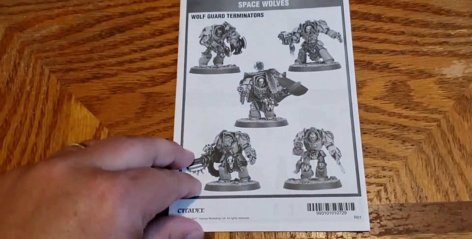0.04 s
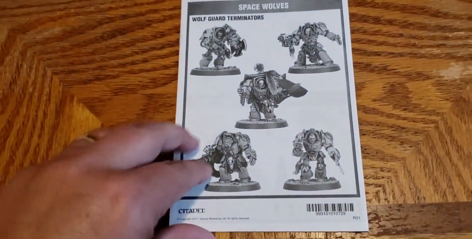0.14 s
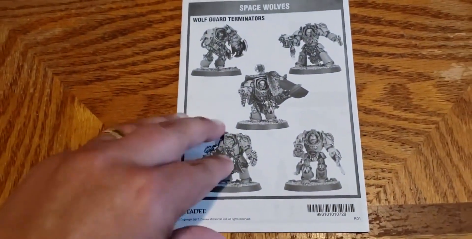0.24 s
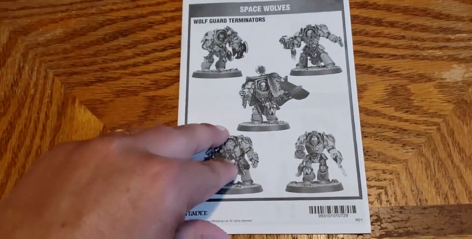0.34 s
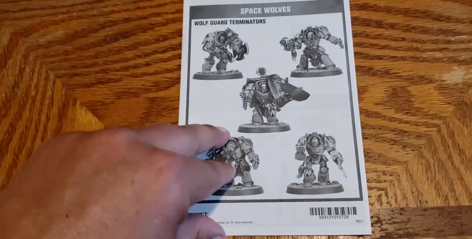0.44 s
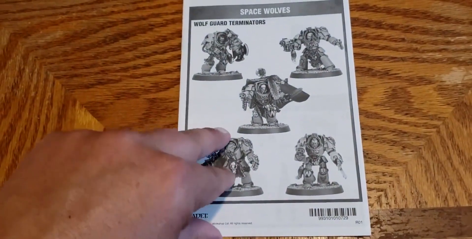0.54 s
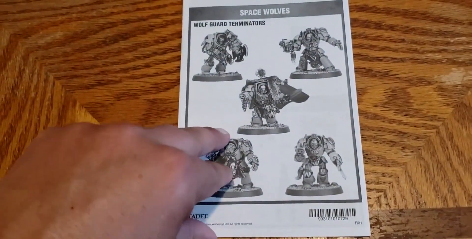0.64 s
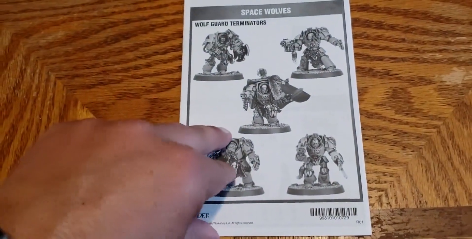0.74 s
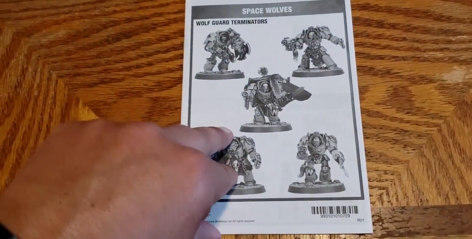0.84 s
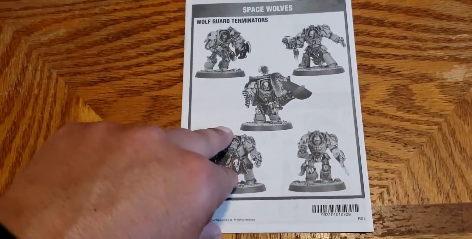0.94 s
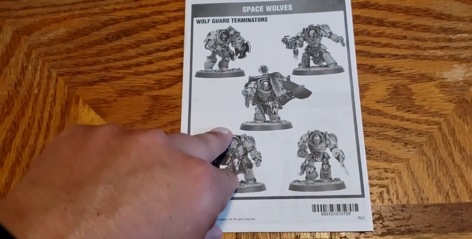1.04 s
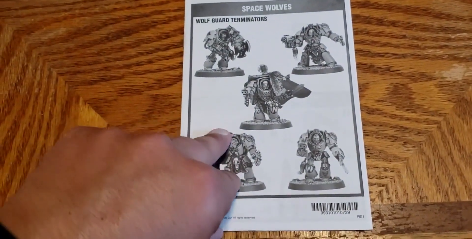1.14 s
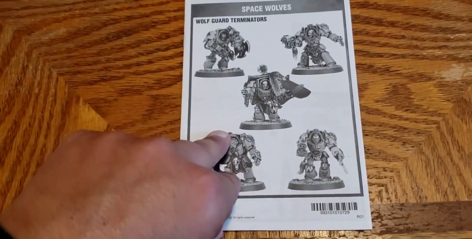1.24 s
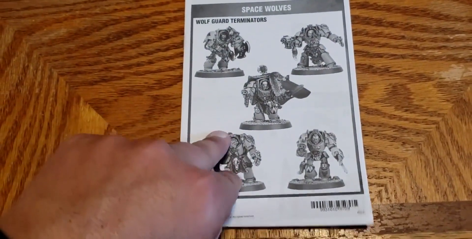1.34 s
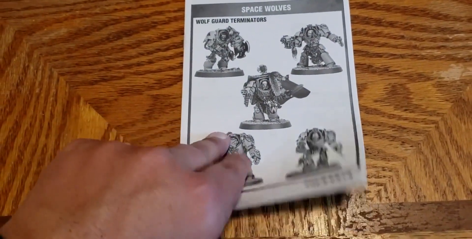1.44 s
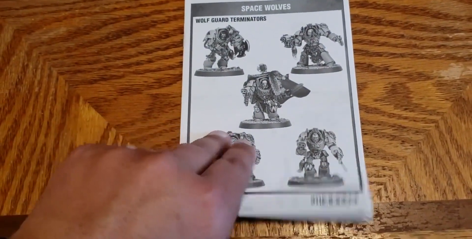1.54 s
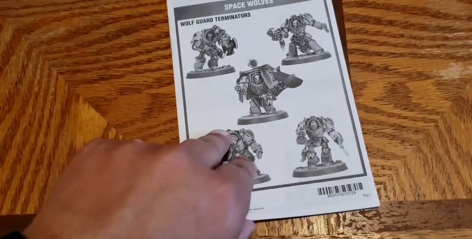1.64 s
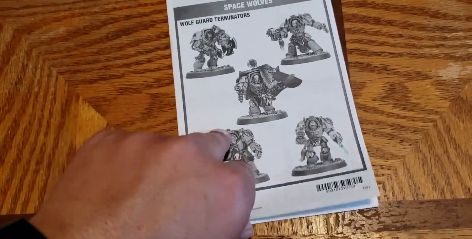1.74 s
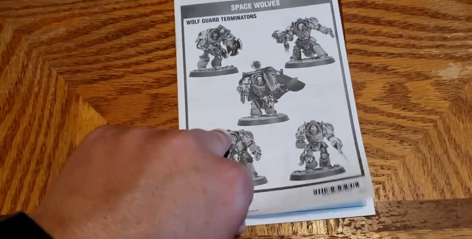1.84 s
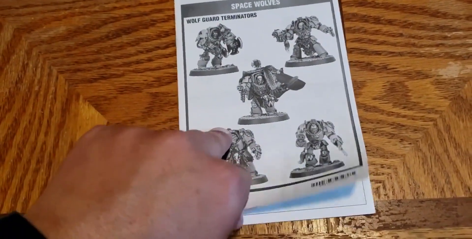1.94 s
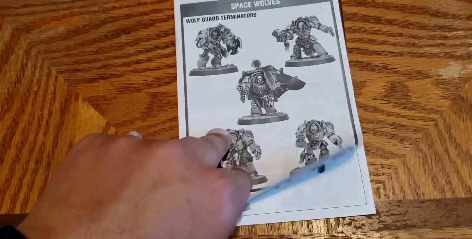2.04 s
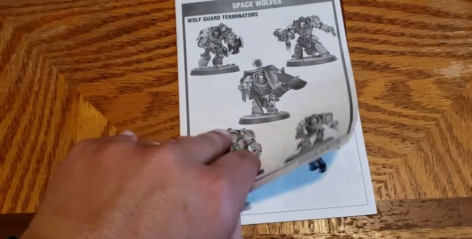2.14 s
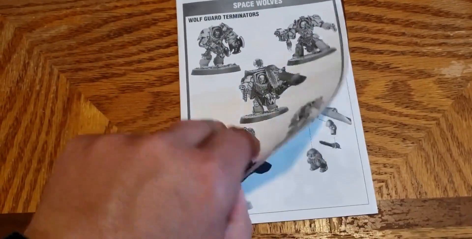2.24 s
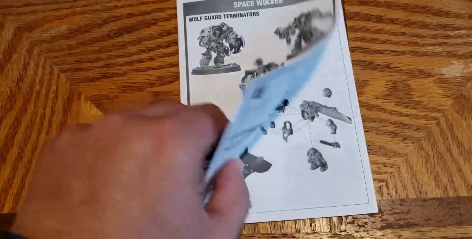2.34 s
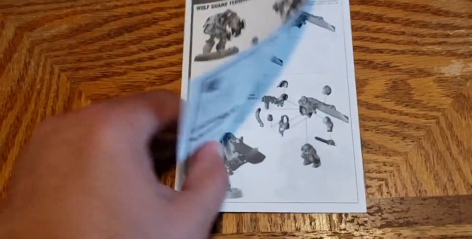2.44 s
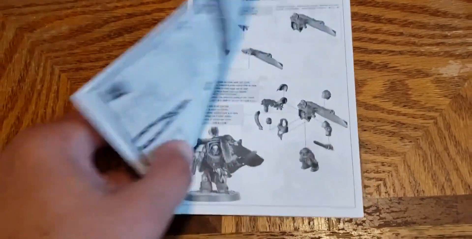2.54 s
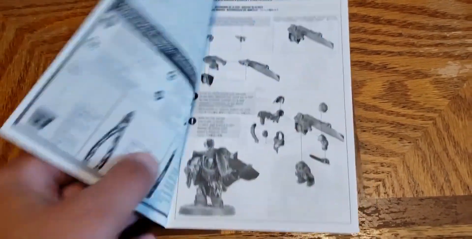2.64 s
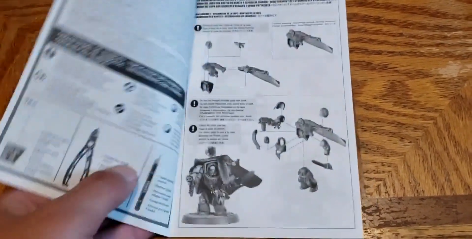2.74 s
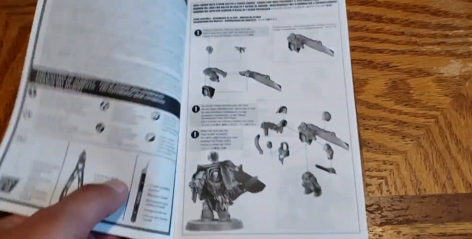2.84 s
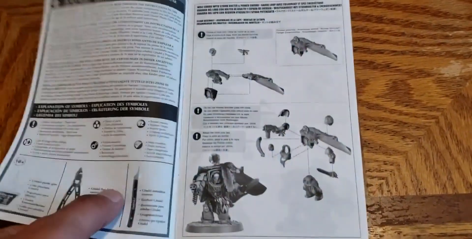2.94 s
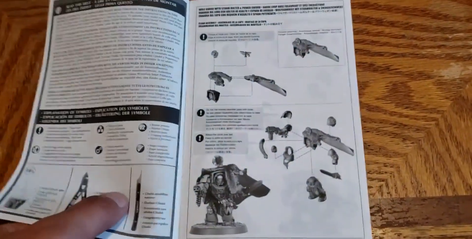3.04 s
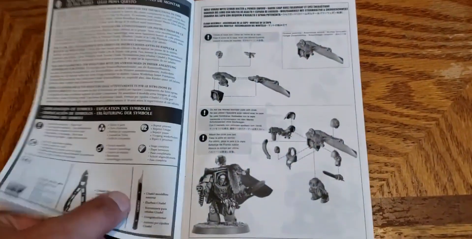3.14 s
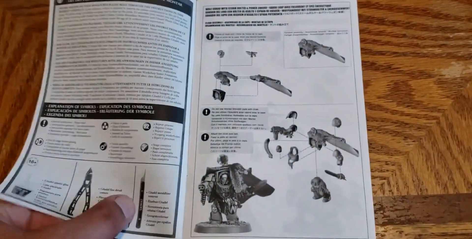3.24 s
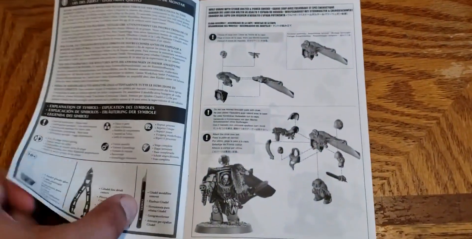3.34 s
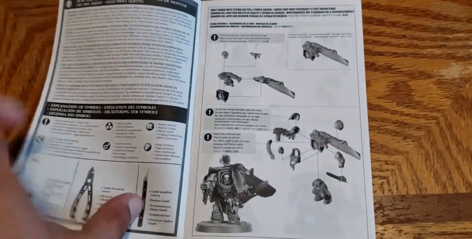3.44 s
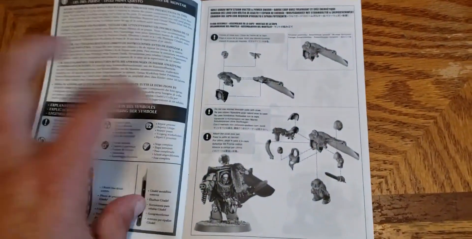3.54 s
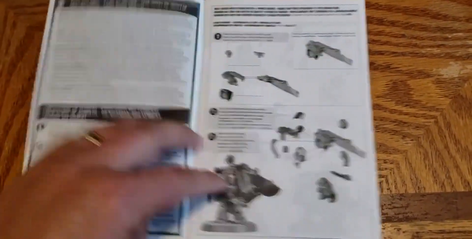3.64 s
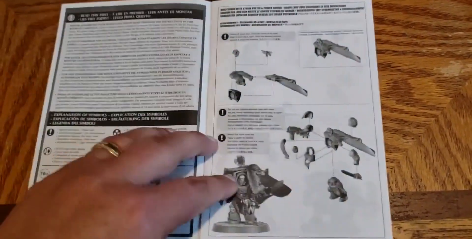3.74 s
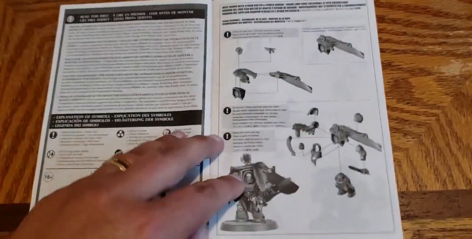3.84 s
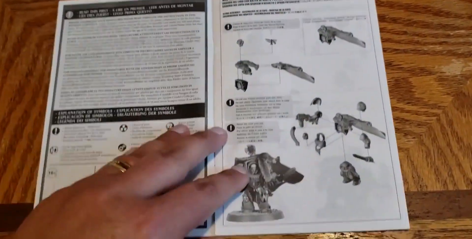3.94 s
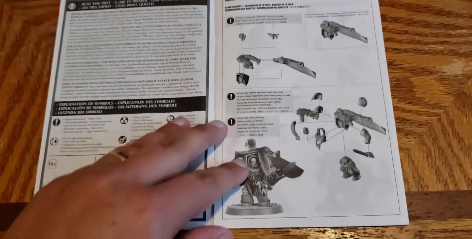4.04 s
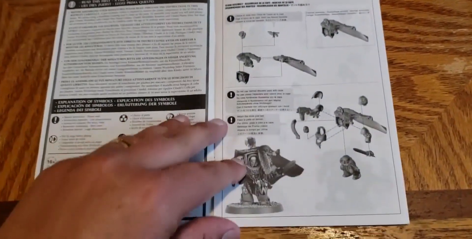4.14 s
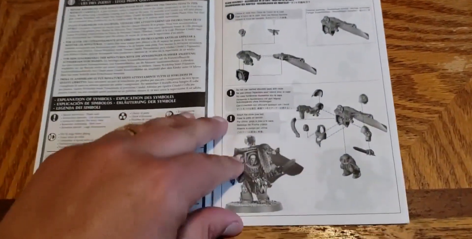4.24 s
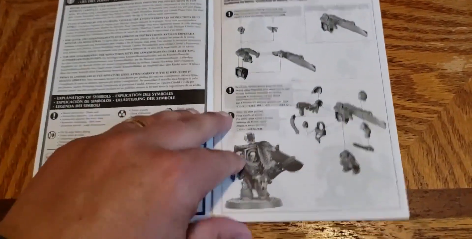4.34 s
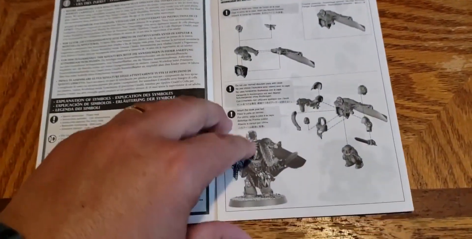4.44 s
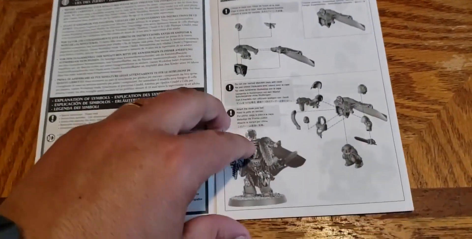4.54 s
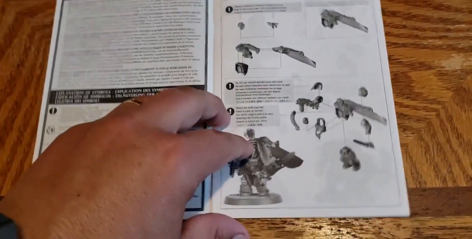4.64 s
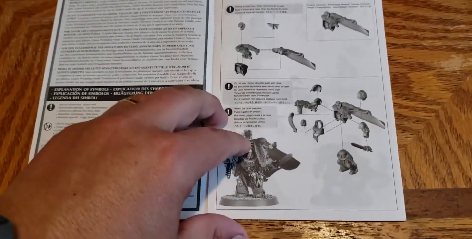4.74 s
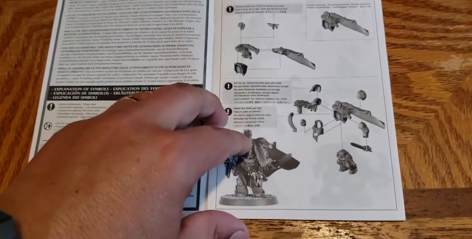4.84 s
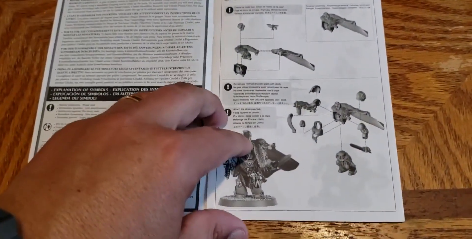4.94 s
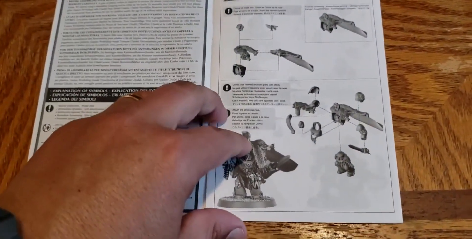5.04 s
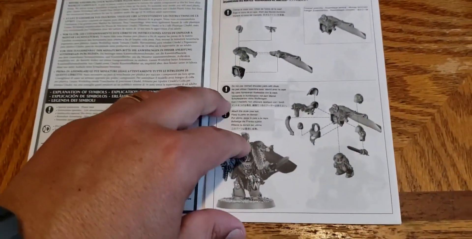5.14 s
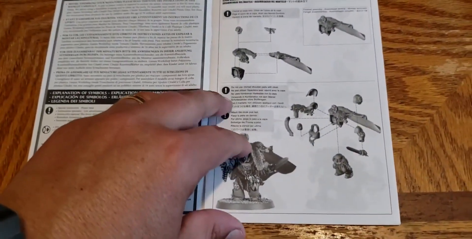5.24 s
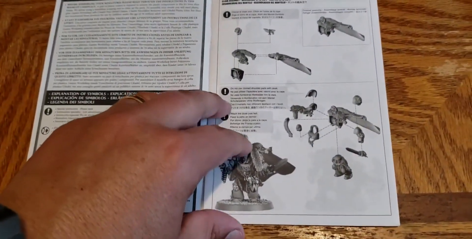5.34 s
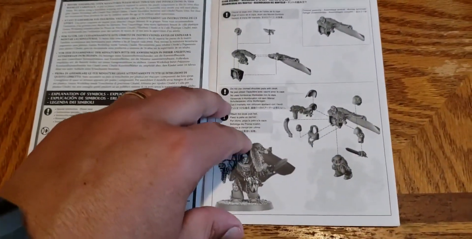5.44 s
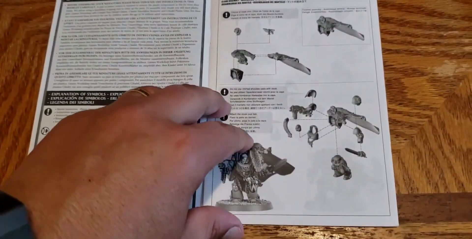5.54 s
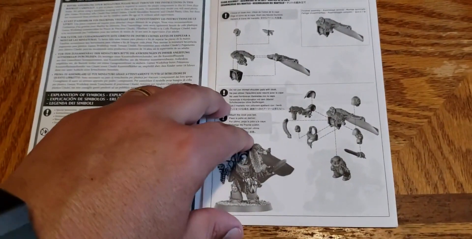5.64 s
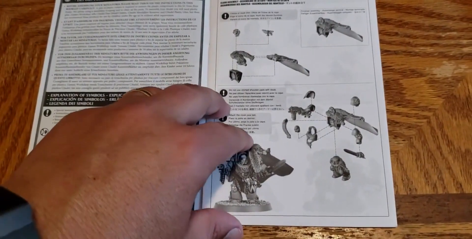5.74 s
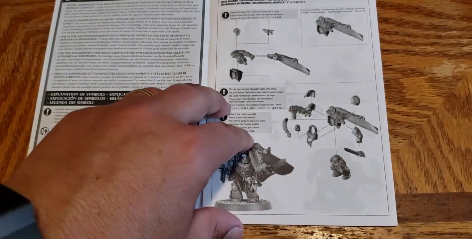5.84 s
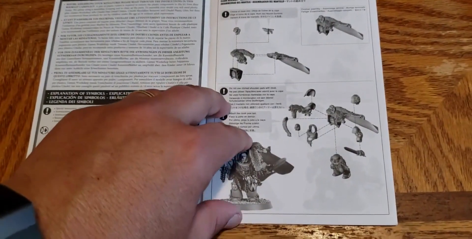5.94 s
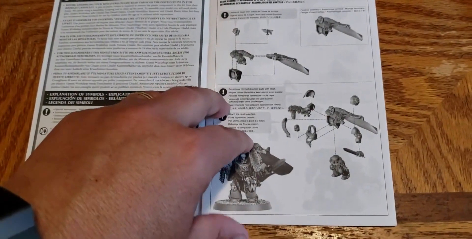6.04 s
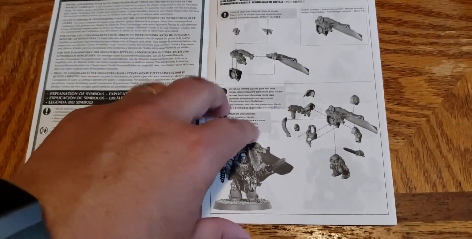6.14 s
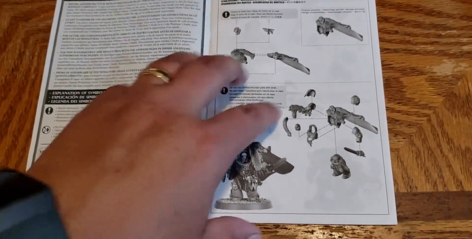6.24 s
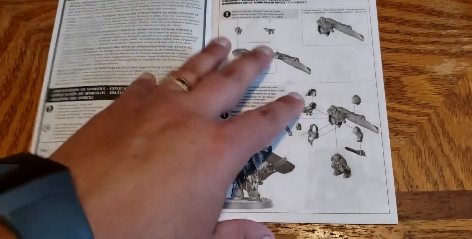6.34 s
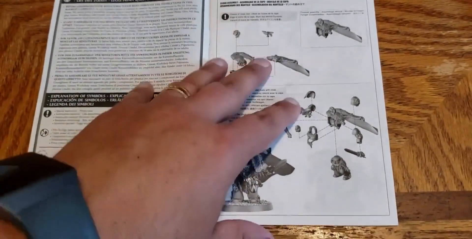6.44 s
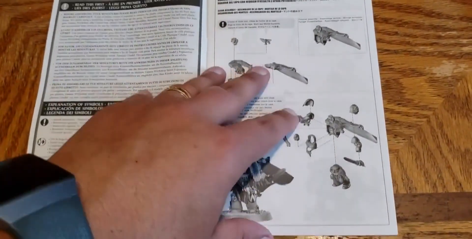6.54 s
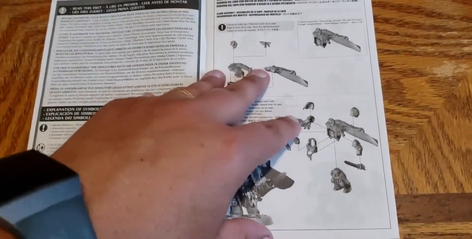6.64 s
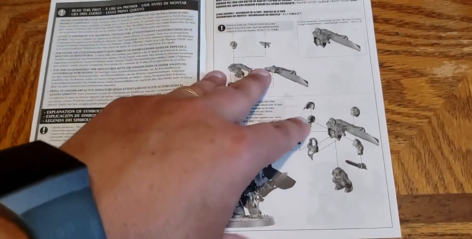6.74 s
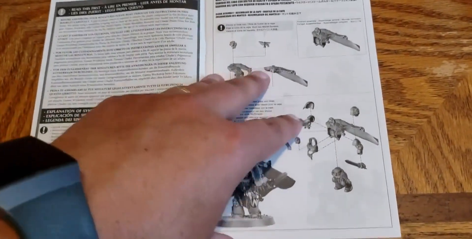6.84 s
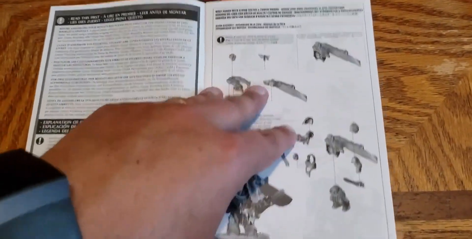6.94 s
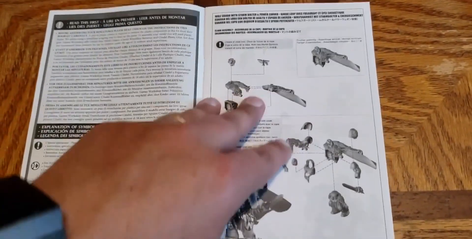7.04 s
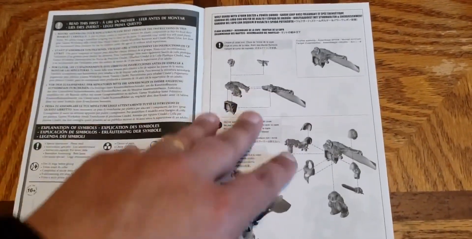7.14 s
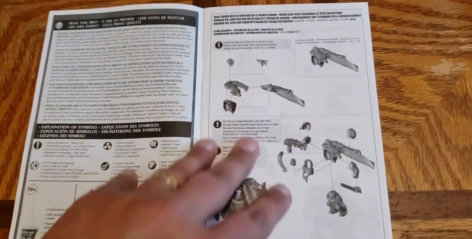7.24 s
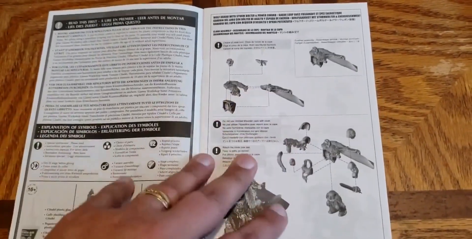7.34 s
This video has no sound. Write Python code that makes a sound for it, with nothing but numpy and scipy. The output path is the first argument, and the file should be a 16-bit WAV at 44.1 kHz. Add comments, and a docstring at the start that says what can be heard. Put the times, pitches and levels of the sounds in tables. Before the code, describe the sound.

Close by in a small, quiet room with a low hum, a hand opens a paper booklet on a wooden table. Light rubbing at the page edge grows into a dry rustle as the cover swings over. Crisp crackles and dull taps mark its landing, the loudest moment. Afterwards fingers brush and press the paper flat, with soft hisses and the faint drag of skin.

```python
"""Turning a booklet cover.

A hand lifts the cover of a paper booklet on a wooden table, turns it over and smooths it down.
Sheets hiss as their fibres slip and catch; the bowed page rustles, buckles with sharp snaps and
lands with a shiver and a table thud. Fingers rub the paper and its edge, the heel of the hand
drags dully, and the small room reflects the paper and hums low."""
import sys
import numpy as np
from scipy import signal
from scipy.fft import rfft, irfft, next_fast_len
from scipy.io import wavfile
from scipy.ndimage import uniform_filter1d, map_coordinates

SR = 44100
rng = np.random.default_rng(int(sys.argv[2]) if len(sys.argv) > 2 else 0)


def digitize_waveform(pressure):
    """Quantize a signal to 16-bit integers and store it at the path in sys.argv[1].

    Rows of a 2-D input are taken as channels; values are limited to [-1, 1].
    """
    field = np.atleast_2d(pressure).T
    bounded = np.clip(field, -1, 1)
    quanta = np.round(bounded * 32767).astype(np.int16)
    wavfile.write(sys.argv[1], SR, quanta)


N = 326340

# Levels are relative; each source applies its own gain.
# cover dragging on the page below: (time [s], friction [dB], fizz offset [dB])
COVER_TURN = [(2.29, -55.5, -8), (2.374, -53, -3.5), (2.56, -53.5, -4.5), (2.618, -63.5, 1),
              (2.706, -56, 0), (2.754, -63, 5), (2.95, -56.5, -5), (3.06, -44, 1.5), (3.104, -48.5, -3),
              (3.21, -39.5, -1.5), (3.248, -49, -2.5), (3.31, -45.5, 4.5), (3.352, -45.5, -11.5),
              (3.52, -50.5, 2)]
# sheet pushed over sheet: (peak time [s], rise [s], fall [s], friction [dB], fizz offset [dB])
SHEET_SLIDES = [(.1, 0.18, 0.028, -75.5, 3), (.245, 0.066, 0.048, -64, -3), (.35, 0.13, 0.15, -72, 5),
                (.62, 0.065, .1, -78, 3), (.79, .04, 0.072, -70, 13), (.88, 0.078, 0.072, -69, 12),
                (1.034, 0.024, 0.028, -70.5, 1), (1.48, 0.14, 0.11, -78, 13),
                (1.715, 0.04, 0.045, -47, -22), (1.752, 0.036, 0.07, -50, 1.5),
                (1.896, 0.064, 0.051, -56.5, 5), (1.985, 0.027, 0.066, -59.5, 2),
                (2.14, 0.046, 0.13, -65, -1), (2.236, 0.025, 0.044, -46.5, -2.5),
                (3.558, 0.044, 0.06, -42.5, -1.5), (3.717, 0.027, .02, -50.5, 2),
                (3.785, .022, 0.042, -36.5, 0), (3.92, 0.2, 0.048, -55, -0.5), (4.07, 0.14, .12, -61, 4),
                (4.35, 0.06, 0.3, -66.5, 10), (4.465, .035, 0.057, -54, 4), (4.55, 0.045, 0.12, -60.5, 2.5),
                (4.78, 0.019, .045, -57.5, -2.5), (4.85, .05, 0.13, -71, -5), (5.095, 0.048, 0.029, -69, 4),
                (5.26, 0.14, 0.11, -70, 0.5), (5.49, .04, 0.076, -73.5, 4), (6.034, 0.019, 0.031, -63, 5.5),
                (6.14, .02, 0.041, -71, 5.5), (6.297, 0.024, 0.041, -68, 10.5),
                (6.525, 0.029, 0.027, -58.5, -11), (6.62, 0.1, .1, -58, -0.5), (6.71, .05, .04, -60.5, 1),
                (6.83, 0.082, 0.1, -65, 5.5), (7.069, 0.077, 0.082, -46.5, -2),
                (7.25, 0.094, 0.1, -57, 5.5), (7.36, 0.091, 0.1, -54, 4.5)]
# page bending as a whole: (peak time [s], rise [s], fall [s], level [dB])
PAGE_FLEXES = [(.3, 0.16, 0.18, -77.5), (2.23, .015, .06, -61), (2.7, .3, .25, -70),
               (3.062, 0.045, 0.035, -44.5), (3.147, .02, 0.03, -48), (3.208, .03, .025, -49),
               (3.3, .03, .03, -48.5), (3.58, 0.023, .018, -42), (3.785, .018, 0.03, -40),
               (4.48, .05, 0.058, -68.5), (4.78, 0.029, 0.056, -72.5), (6.025, 0.018, 0.03, -73.5),
               (6.54, 0.079, 0.14, -74), (7.075, .06, .065, -59.5)]
# thumb under the page edge: (peak time [s], rise [s], fall [s], level [dB])
EDGE_RUBS = [(.33, 0.16, .16, -71), (.9, 0.097, 0.14, -60), (1.08, .1, 0.18, -68.5),
             (1.33, 0.11, .11, -67.5), (1.583, 0.014, 0.039, -67), (1.7, 0.047, .08, -54),
             (1.995, 0.016, 0.039, -66), (2.42, 0.21, 0.18, -63), (5.12, 0.21, .3, -81.5),
             (6.48, 0.081, .2, -74)]
# position of the rubbing: (time [s], left minus right [dB])
RUB_BALANCE = [(0, -2.5), (1, -7.5), (2, -6.5), (3.5, -2.7), (7.4, -3)]
# sheet buckling: (time [s], level [dB], pitch [Hz], rise [cycles], left minus right [dB])
BUCKLES = [(2.2292, -27.5, 2880, 1.27, -12.5), (2.23, -28.5, 5460, 1.34, -10),
           (3.0637, -23.5, 1220, 0.58, 1), (3.0635, -27.5, 3900, 0.6, -18), (3.2787, -20.5, 2100, 1.6, 0.5),
           (3.28, -33.5, 3380, 1.5, -13), (3.5645, -12.5, 4600, 1.7, -5.5),
           (3.5644, -21.5, 2930, 0.94, -13.5), (3.568, -16.5, 3160, 1.0, -9), (3.776, -25.5, 2200, 1.3, -6),
           (3.7846, -18, 6200, 2.3, -12), (3.7886, -10.5, 5900, 2.2, -9.5), (3.7902, -18, 3280, 2.8, -8.5),
           (6.53, -37.5, 3130, 1.0, -14), (6.5318, -28.5, 5430, 1.2, -8.5)]
# page flicked, landing or patted: (time [s], shiver [dB], shiver t60 [s], pitch [Hz], thud [dB])
PAGE_SLAPS = [(0.222, -60, 0.022, 5500, -57), (0.429, -61, 0.11, 6700, -55),
              (1.569, -56.5, 0.12, 3620, -78), (1.667, -52.5, 0.085, 3850, -74),
              (2.23, -44, 0.2, 3000, -49.5), (2.707, -46, .04, 8000, -56.5), (3.064, -44, 0.048, 885, -71),
              (3.206, -39, 0.058, 1810, -47), (3.555, -29.5, 0.023, 9100, -45.5),
              (3.567, -34.5, 0.054, 2220, -46.5), (3.703, -39, 0.024, 9000, -49.5),
              (3.756, -35.5, .06, 10000, -55.5), (3.789, -31.5, 0.064, 3530, -38.5),
              (4.365, -69, .06, 6000, -53), (4.443, -40.5, 0.057, 13500, -51),
              (4.585, -39.5, 0.031, 14400, -54), (4.614, -45, 0.073, 14600, -57),
              (6.014, -59, .08, 6060, -54.5), (6.53, -47.5, 0.12, 3530, -58), (6.987, -50, 0.1, 6500, -52)]
# brief brushes and swishes of fingers and the turning page:
# (time [s], length [s], level [dB], centre [Hz], width per stage [Hz])
BRIEF_SWISHES = [(0.193, 0.48, -75, 457, 450), (1.668, 0.056, -48.5, 3180, 1800),
                 (2.763, 0.36, -65.5, 790, 805), (2.909, 0.12, -57.5, 1050, 760),
                 (3.12, 0.2, -48, 9150, 2100), (3.192, 0.069, -46, 3430, 4500),
                 (3.295, 0.034, -47, 2800, 3200), (3.988, 0.22, -54.5, 5660, 5000),
                 (4.302, 0.19, -57.5, 6140, 2800), (4.463, 0.057, -60, 2980, 3030),
                 (4.754, 0.041, -54, 6000, 2600), (5.447, 0.1, -73.5, 950, 553),
                 (6.018, 0.042, -60, 6600, 4020), (6.273, 0.055, -67, 6130, 2630),
                 (6.561, 0.33, -64, 5700, 3000)]
# heel of the hand on the table: (peak time [s], rise [s], fall [s], level [dB])
HEEL_SHIFTS = [(.33, 0.17, 0.14, -61.5), (1, .22, 0.4, -66.5), (2.1, 0.68, 0.3, -76),
               (2.75, 0.5, 0.26, -64), (3.2, 0.082, 0.24, -62.5), (3.7, 0.095, 0.55, -70),
               (4.58, 0.24, 0.16, -66.5), (5.25, .35, 0.32, -72.5), (7.1, .15, 0.36, -70)]

# noise spectra: (frequency [Hz], density [dB])
FRICTION_SPECTRUM = [(1200, -34), (1900, -19.5), (2450, -2.5), (3200, -3), (4300, -3), (5600, 0.5),
                     (7000, -4.5), (9000, -5.5), (15000, -14)]
FIZZ_SPECTRUM = [(4000, -32.5), (6500, -4), (8500, -4), (10000, -2), (12000, 0.5), (15500, -1.5)]
BOW_SPECTRUM = [(250, -22.5), (500, -15), (1000, -4.5), (1400, -8), (1900, -0.5), (2600, -2.5), (4000, -6),
                (8000, -32)]
SKIN_SPECTRUM = [(120, -20.5), (280, -3.5), (480, -2.5), (750, -9.5), (1200, -27.5), (2500, -55)]
ROOM_SPECTRUM = [(25, -21.5), (45, -9), (80, 0.5), (130, -7.5), (220, -11.5), (320, -10.5), (450, -27),
                 (800, -24.5), (1300, -32.5), (2500, -31), (4500, -42.5), (9000, -46), (15000, -36)]
# resonances: (centre [Hz], width [Hz], gain [dB])
EDGE_MODES = [(2950, 1070, 0)]
TABLE_MODES = [(168, 110, 6), (240, 70, -1.5), (400, 430, -18.5)]
HUM_MODES = [(81, 13, -1.5), (189, 40, -13.5), (256, 13, -11)]
# left-right likeness: (frequency [Hz], coherence [0..1])
PAPER_COHERENCE = [(300, 0.28), (1500, 0.25), (4000, 0.2), (8000, 0.18), (15000, 0.14)]
ROOM_COHERENCE = [(30, .8), (75, 0.97), (130, 0.96), (290, 0.83), (640, 0.24), (1400, 0.088), (4000, .1),
                  (15000, .1)]
# room decay: (frequency [Hz], t60 [s])
ROOM_T60 = [(200, 0.28), (1500, 0.21), (5000, 0.11), (15000, 0.16)]

SWELL_DROP_DB, SWELL_ROUNDNESS = 10.5, 1.3  # drop at one rise before, one fall after the peak
TURN_FADE_DB_PER_S, TURN_BOW_OFFSET_DB = 257, -18.5
REST_FRICTION_DB, REST_FIZZ_DB, REST_HAND_DB = -83.5, -81, -75  # a resting hand is never quite still
CUTOFF_HZ = 15650


def rustle():
    """Friction hisses, light fast contact fizzes, the bowed sheet sounds lower, the thumb rubs the edge."""
    turn_friction, turn_fizz = cover_turn()
    slide_friction = swells(row[:-1] for row in SHEET_SLIDES)
    slide_fizz = swells((*timing, db + fizz_db) for *timing, db, fizz_db in SHEET_SLIDES)
    rubbing = amp(2.0) * power_sum(turn_friction, slide_friction, amp(REST_FRICTION_DB))
    skimming = amp(2.35) * power_sum(turn_fizz, slide_fizz, amp(REST_FIZZ_DB))
    bending = amp(5.56) * power_sum(swells(PAGE_FLEXES), amp(TURN_BOW_OFFSET_DB) * turn_friction)
    grip = amp(1.7 * wobble(45) + 0.87 * wobble(220))  # stick and slip
    friction = rubbing * fibres(spectrum(FRICTION_SPECTRUM), catches_per_s=490, grit=0.41, drift_db=2)
    fizz = skimming * fibres(spectrum(FIZZ_SPECTRUM), catches_per_s=700, grit=0.45, drift_db=3)
    bow = bending * fibres(spectrum(BOW_SPECTRUM), catches_per_s=300, grit=0.27, drift_db=5)
    edge = fibres(resonator(EDGE_MODES, stages=4), catches_per_s=810, grit=0.3, drift_db=1.5)
    thumb = swells(EDGE_RUBS) * edge
    contacts = pan(friction + fizz + thumb, right_lag_ms=0.14, left_db=curves(RUB_BALANCE)[0])
    return grip * (contacts + pan(bow, right_lag_ms=0.15, left_db=2.8))


def cover_turn():
    """Friction and fizz gains of the dragging cover, faded at both ends."""
    friction_db, fizz_db = curves(COVER_TURN)
    t = np.arange(N) / SR
    outside_s = np.abs(t - np.clip(t, COVER_TURN[0][0], COVER_TURN[-1][0]))
    faded_db = friction_db - TURN_FADE_DB_PER_S * outside_s
    return amp(faded_db - 0.5), amp(faded_db + fizz_db + 3.5)


def fibres(colour, catches_per_s, grit, drift_db):
    """Countless tiny slips plus sparse catches; the colour drifts as the sheet bends."""
    slips = rng.standard_normal((2, N))
    catches = unit((rng.random(N) < catches_per_s / SR) * rng.standard_normal((2, N)))
    bins = signal.stft(slips + grit * catches, nperseg=512)[2]
    drift = uniform_filter1d(rng.standard_normal(bins.shape), 6, axis=1)
    drift = unit(uniform_filter1d(drift, 22, axis=2))
    patchy = signal.istft(bins * amp(drift_db * drift), nperseg=512)[1][:, :N]
    return stereo(patchy, colour, PAPER_COHERENCE)


def snaps():
    """A buckle flips in a few cycles, with a short crack in the sheet around it."""
    out, t = np.zeros((2, N)), np.arange(SR // 30) / SR
    for start_s, db, hz, cycles, left_db in BUCKLES:
        rise = t * hz / cycles
        flip = np.sin(2 * np.pi * hz * t) * rise ** 2 * np.exp(2 * (1 - rise))
        crack = noise(len(t), resonator([(hz, 3 * hz, 0)]), PAPER_COHERENCE)
        crack *= 0.22 * (1 - np.exp(-2 * rise)) * decay(t, t60_s=0.008)
        add(out, start_s, pan(amp(db) * (flip + crack), right_lag_ms=0.14, left_db=left_db))
    return out


def slaps():
    """A slapped sheet shivers briefly and the table top thuds."""
    out, t = np.zeros((2, N)), np.arange(SR // 3) / SR
    wood = lowpassed(resonator(TABLE_MODES), corner_hz=800)
    cushion = 1 - np.exp(-t / 0.0038)  # trapped air softens the landing
    for start_s, shiver_db, t60_s, hz, thud_db in PAGE_SLAPS:
        sheet = resonator([(hz, min(1.5 * hz, 6000), 0)], stages=2)
        shiver = noise(len(t), sheet, PAPER_COHERENCE) * decay(t, t60_s)
        thud = noise(len(t), wood, ROOM_COHERENCE) * cushion * decay(t, t60_s=0.21)
        add(out, start_s, amp(shiver_db) * pan(shiver, right_lag_ms=0.12, left_db=-0.5))
        add(out, start_s, amp(thud_db) * thud)
    return out


def swishes():
    """A swish starts fast and slows, hissing in a narrow band."""
    out = np.zeros((2, N))
    for start_s, length_s, db, hz, width_hz in BRIEF_SWISHES:
        progress = np.linspace(0, 1, round(length_s * SR))
        speed = np.sin(np.pi * np.sqrt(progress))
        hiss = noise(SR // 2, resonator([(hz, width_hz, 0)], stages=4), PAPER_COHERENCE)
        add(out, start_s, amp(db) * speed * hiss[:, :len(speed)])
    return pan(out, right_lag_ms=0.083, left_db=-6)


def hand():
    """Skin drags dully over wood and paper."""
    drag = noise(N, spectrum(SKIN_SPECTRUM), ROOM_COHERENCE)
    motion = power_sum(swells(HEEL_SHIFTS), amp(REST_HAND_DB))
    return motion * amp(0.75 * wobble(7.8)) * drag


def reflections(x):
    """The walls return a short tail, each frequency decaying at its own rate."""
    hz, t, bins = signal.stft(rng.standard_normal((2, SR // 2)), SR, nperseg=256)
    tail = signal.istft(bins * decay(t, log_interp(ROOM_T60, hz)[:, None]), SR, nperseg=256)[1]
    tail /= np.linalg.norm(tail[0])
    tail = np.pad(tail, ((0, 0), (SR // 250, 0)))  # 4 ms pre-delay
    return signal.fftconvolve(x, tail, axes=1)[:, :N]


def room_hum():
    """The room's low, wavering drone over a faint hiss."""
    floor = noise(N, spectrum(ROOM_SPECTRUM), ROOM_COHERENCE)
    drone = noise(N, lowpassed(resonator(HUM_MODES), corner_hz=450), ROOM_COHERENCE)
    return amp(-62) * floor + amp(-57.5 + 2.7 * wobble(10)) * drone


def amp(db):
    """Decibels to gain."""
    return 10 ** (np.asarray(db) / 20)


def unit(x):
    """Scale to rms 1."""
    return x / np.sqrt(np.mean(x ** 2) + 1e-20)


def decay(t, t60_s):
    """Exponential fall, 60 dB per t60_s."""
    return amp(-60 * t / t60_s)


def power_sum(*gains):
    """Joint gain of unrelated sounds."""
    return np.sqrt(sum(g ** 2 for g in gains))


def swells(moves):
    """Gain curve of movements that speed up and slow down, summed in power."""
    power = np.zeros(N)
    for peak_s, rise_s, fall_s, db in moves:
        first, last = int((peak_s - np.pi * rise_s) * SR), int((peak_s + np.pi * fall_s) * SR)
        i = np.arange(max(0, first), min(N, last))
        away = np.maximum((peak_s - i / SR) / rise_s, (i / SR - peak_s) / fall_s)
        power[i] += amp(db - SWELL_DROP_DB * away ** SWELL_ROUNDNESS) ** 2
    return np.sqrt(power)


def curves(rows):
    """Per-sample curve of each column after the time."""
    times_s, *columns = np.transpose(rows)
    return [np.interp(np.arange(N) / SR, times_s, column) for column in columns]


def wobble(rate_hz):
    """Smooth random curve with knots at rate_hz."""
    knots = rng.standard_normal(int(N * rate_hz / SR) + 4)
    return map_coordinates(knots, [np.arange(N) * rate_hz / SR])


def log_interp(points, hz):
    """Read (frequency [Hz], value) points on a log axis."""
    knots_hz, values = np.transpose(points)
    return np.interp(np.log(hz + 1), np.log(knots_hz + 1), values)


def spectrum(points):
    """Response through (frequency [Hz], level [dB]) points."""
    return lambda f: amp(log_interp(points, f))


def resonator(modes, stages=1):
    """Causal response of modes of alternating sign; more stages steepen the skirts."""
    return lambda f: sum((-1) ** k * amp(db) * 1j * f * width_hz / (hz * hz - f * f + 1j * f * width_hz)
                         for k, (hz, width_hz, db) in enumerate(modes)) ** stages


def lowpassed(response, corner_hz):
    """A response with a 24 dB/octave roll-off added."""
    return lambda f: response(f) / (1 + (f / corner_hz) ** 4)


def filtered(x, response):
    """Apply a complex frequency response."""
    n = x.shape[-1]
    padded = next_fast_len(n + 8192)
    return irfft(rfft(x, padded) * response(np.fft.rfftfreq(padded, 1 / SR)), padded)[..., :n]


def stereo(x, colour, coherence):
    """Two unrelated signals to coloured, partly coherent left and right, rms 1."""
    def response(f):
        angle = np.arccos(np.clip(log_interp(coherence, f), -1, 1)) / 2
        return colour(f) * np.array([np.cos(angle), np.sin(angle)])
    mid, side = filtered(x, response)
    return unit(np.array([mid + side, mid - side]))


def noise(samples, colour, coherence):
    """Coloured stereo noise, rms 1."""
    return stereo(rng.standard_normal((2, samples)), colour, coherence)


def pan(x, right_lag_ms, left_db):
    """Place a sound by delay and level between the channels."""
    side = np.array([[1], [-1]])
    delayed = filtered(x, lambda f: np.exp(1j * np.pi * f * side * right_lag_ms / 1000))
    return delayed * amp(side * left_db / 2)


def add(track, start_s, sound):
    """Mix a sound into a track."""
    part = track[:, round(start_s * SR):][:, :sound.shape[-1]]
    part += sound[..., :part.shape[-1]]


def scene():
    """Paper, hand and room."""
    sliding = rustle() + swishes()
    impacts = snaps() + slaps()
    reverb = reflections(amp(-10.5) * sliding + amp(-13.5) * impacts)
    return sliding + impacts + reverb + hand() + room_hum()


def record(dry):
    """Steep low-pass at the band limit."""
    return filtered(dry, lambda hz: 1 / np.sqrt(1 + (hz / CUTOFF_HZ) ** 300))


dry = scene()
out = record(dry)
digitize_waveform(out)
```